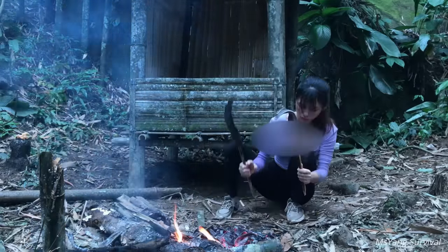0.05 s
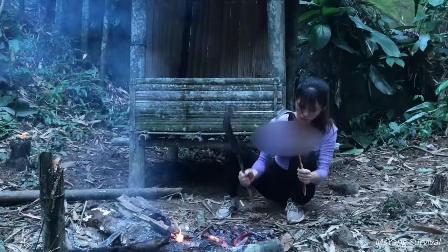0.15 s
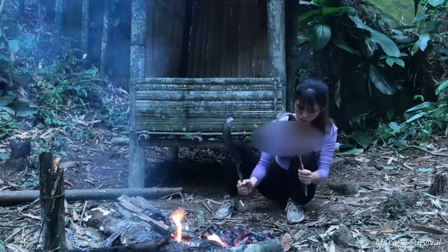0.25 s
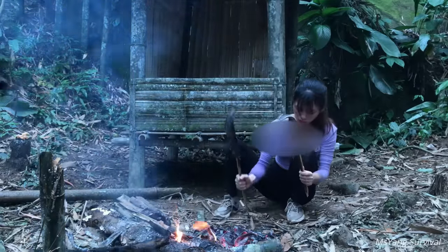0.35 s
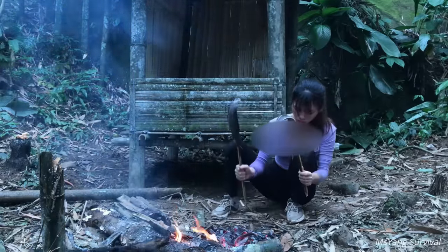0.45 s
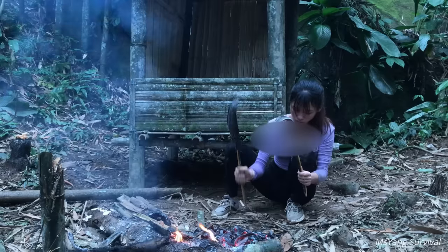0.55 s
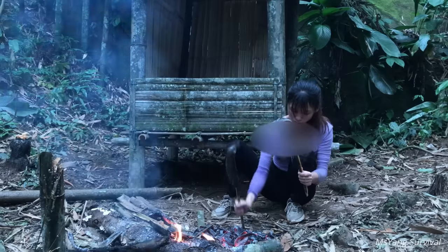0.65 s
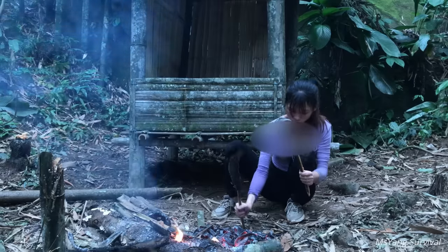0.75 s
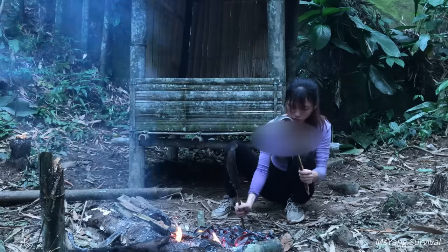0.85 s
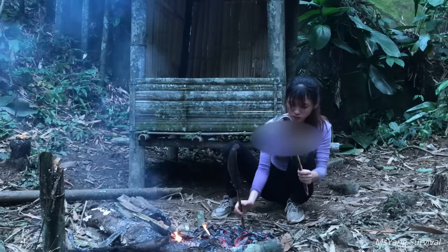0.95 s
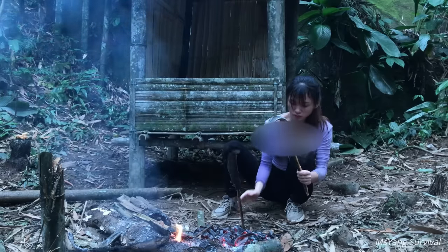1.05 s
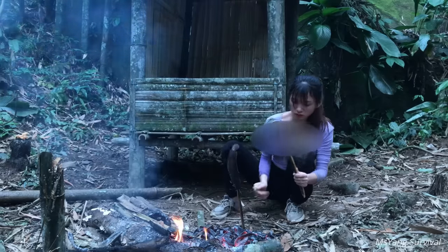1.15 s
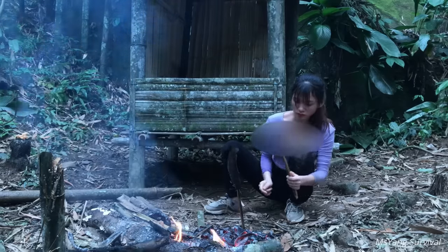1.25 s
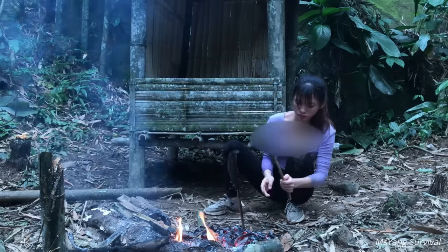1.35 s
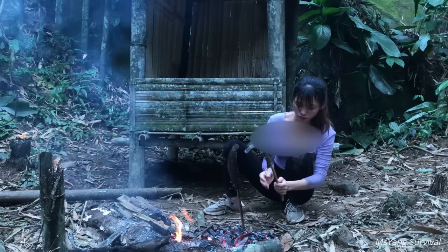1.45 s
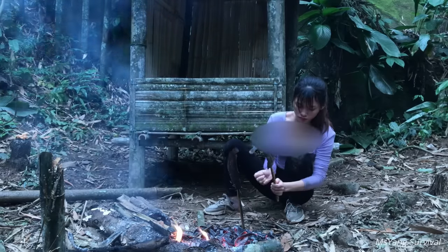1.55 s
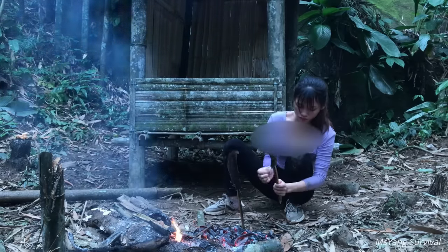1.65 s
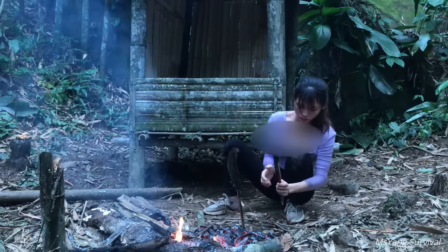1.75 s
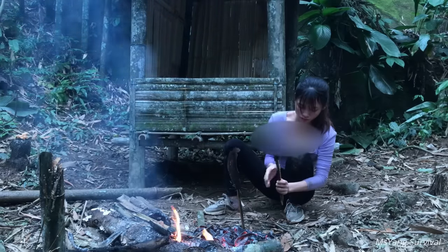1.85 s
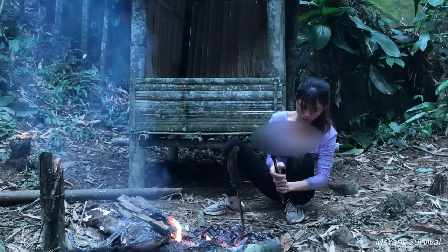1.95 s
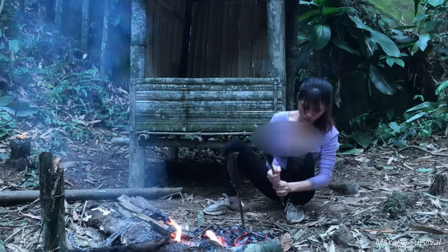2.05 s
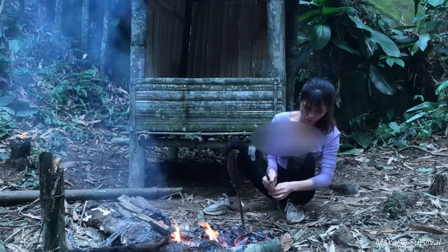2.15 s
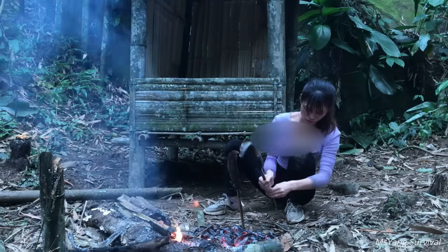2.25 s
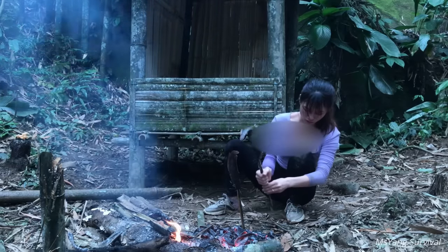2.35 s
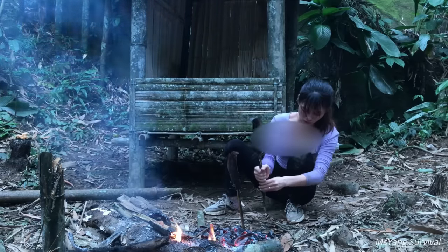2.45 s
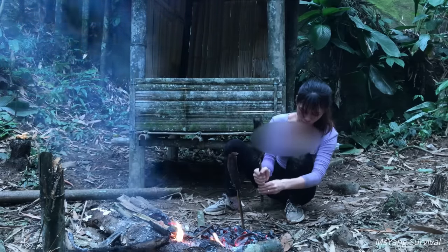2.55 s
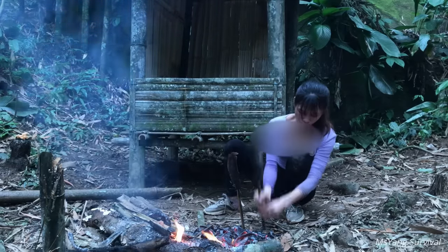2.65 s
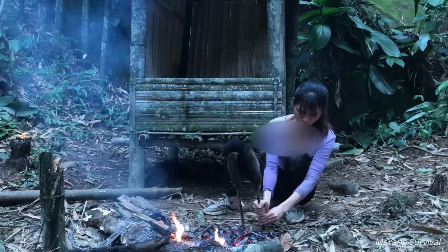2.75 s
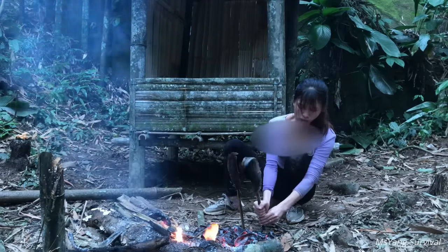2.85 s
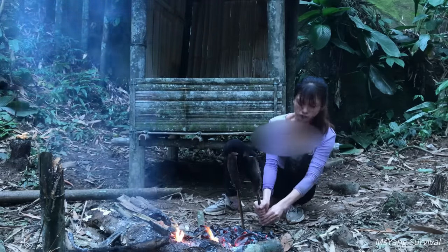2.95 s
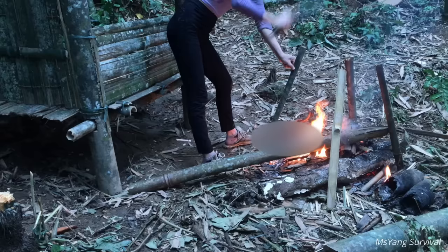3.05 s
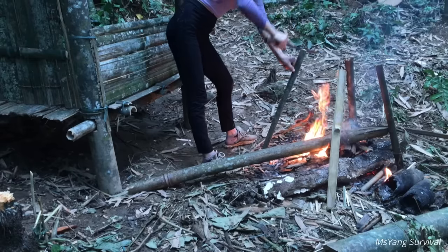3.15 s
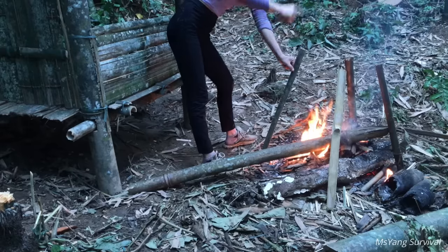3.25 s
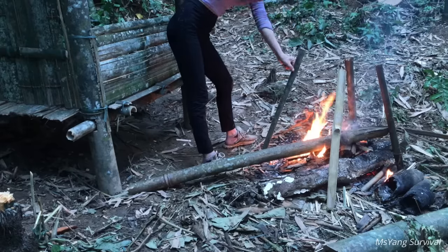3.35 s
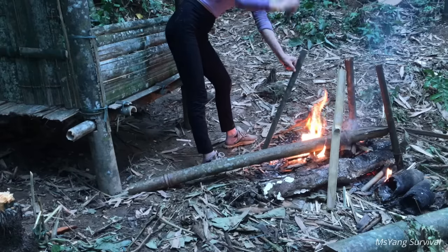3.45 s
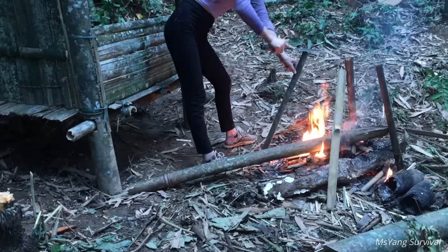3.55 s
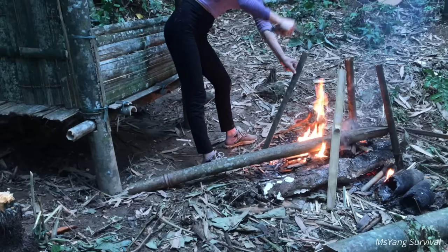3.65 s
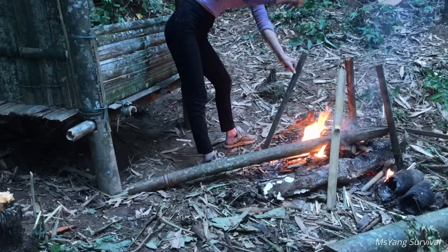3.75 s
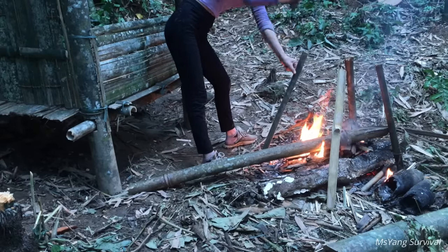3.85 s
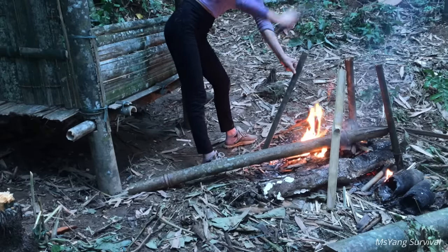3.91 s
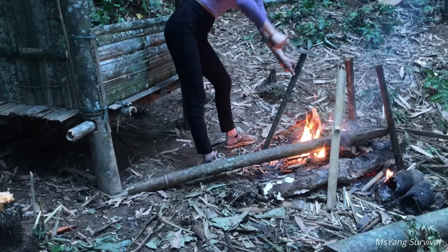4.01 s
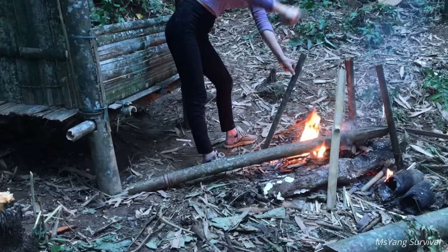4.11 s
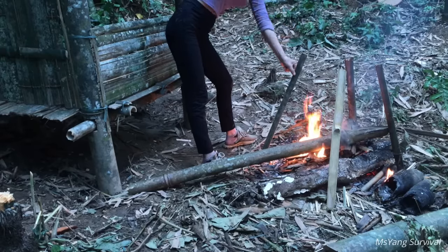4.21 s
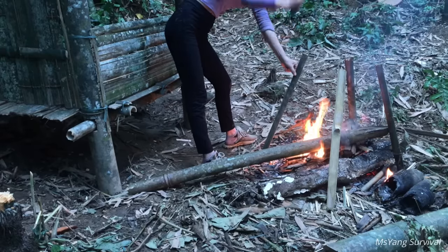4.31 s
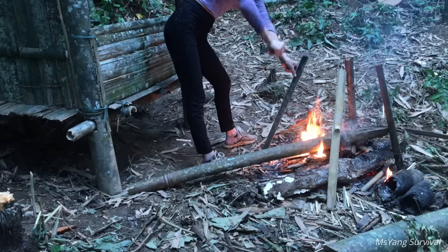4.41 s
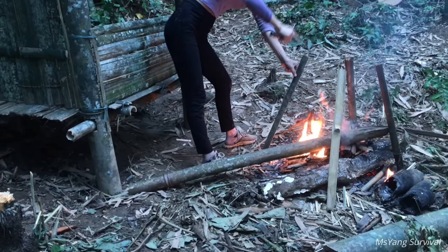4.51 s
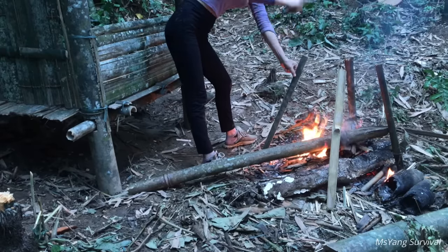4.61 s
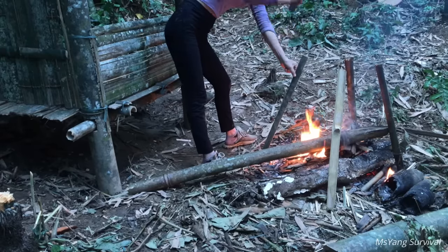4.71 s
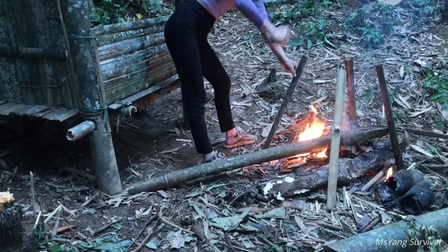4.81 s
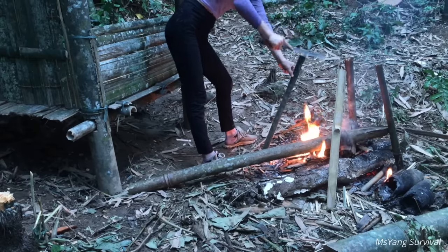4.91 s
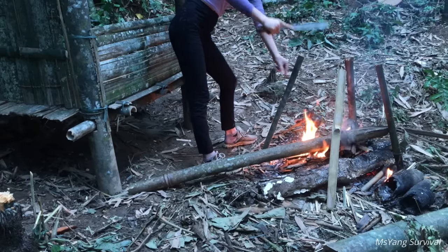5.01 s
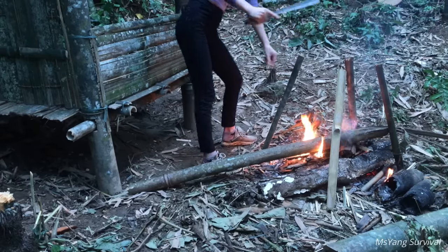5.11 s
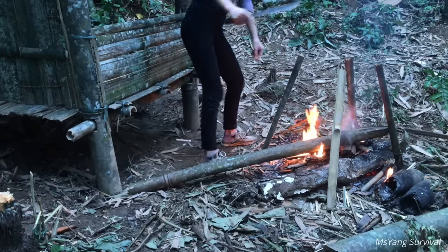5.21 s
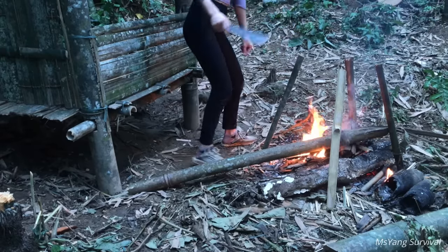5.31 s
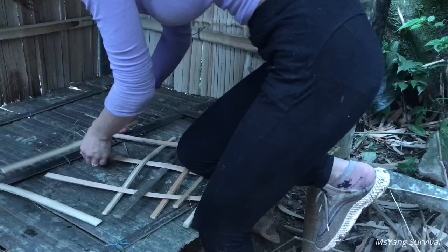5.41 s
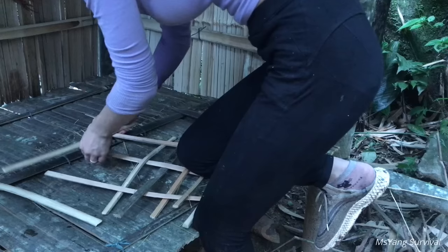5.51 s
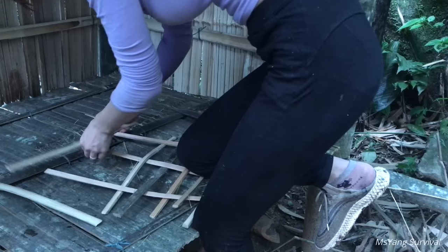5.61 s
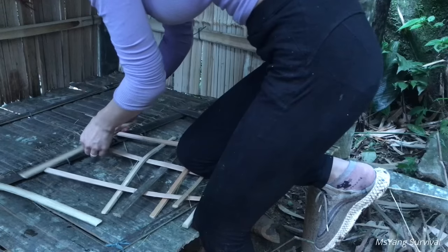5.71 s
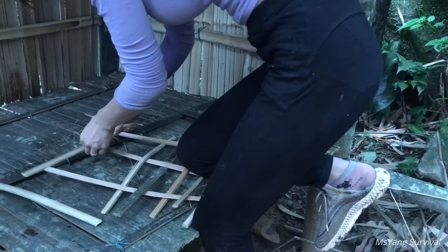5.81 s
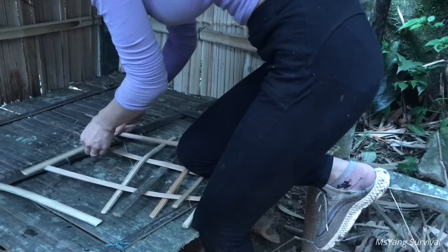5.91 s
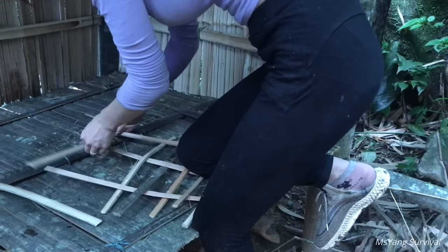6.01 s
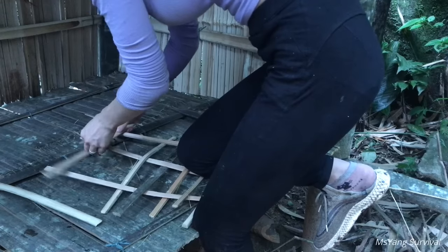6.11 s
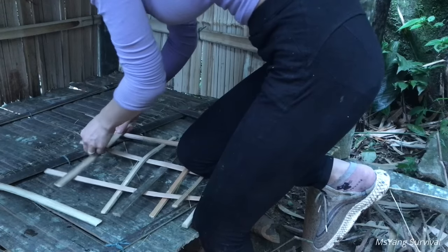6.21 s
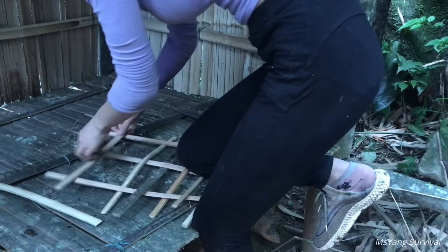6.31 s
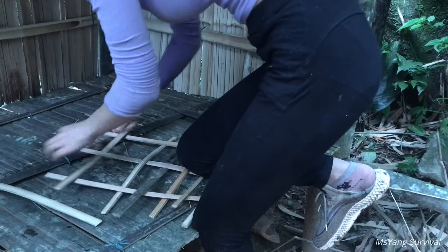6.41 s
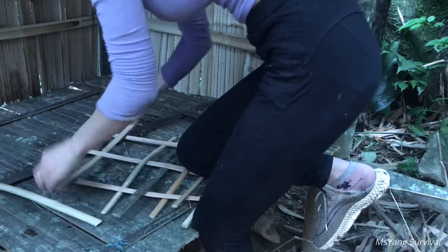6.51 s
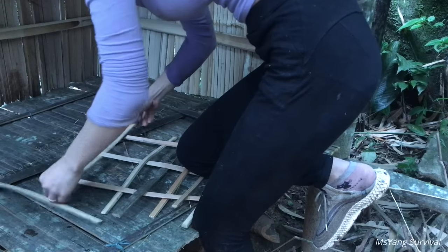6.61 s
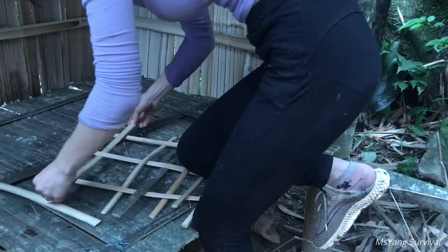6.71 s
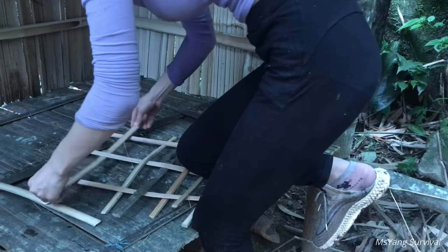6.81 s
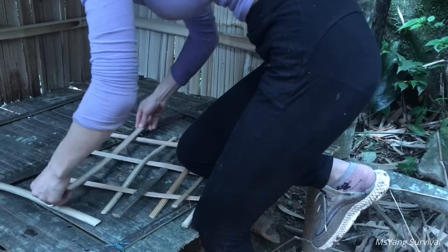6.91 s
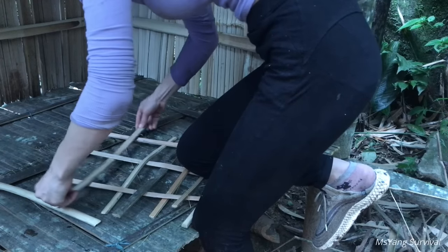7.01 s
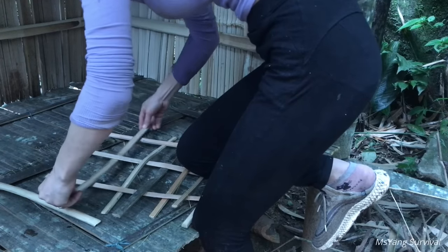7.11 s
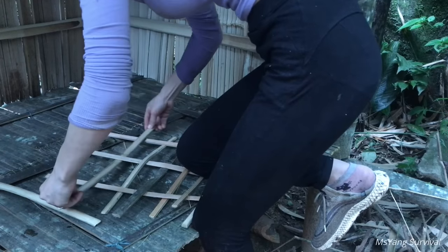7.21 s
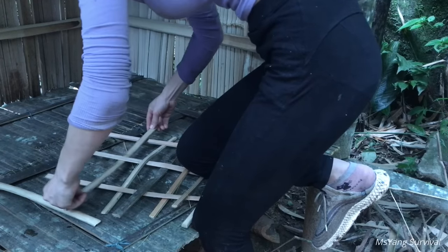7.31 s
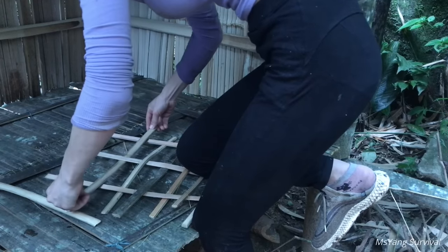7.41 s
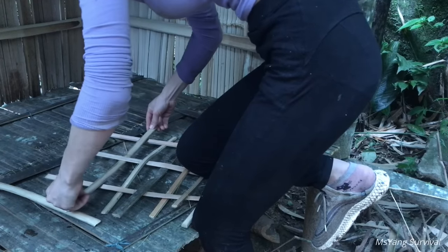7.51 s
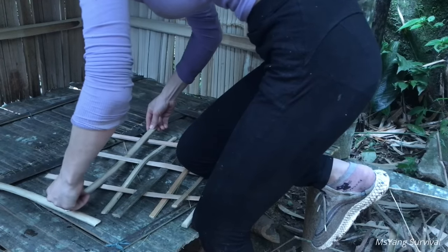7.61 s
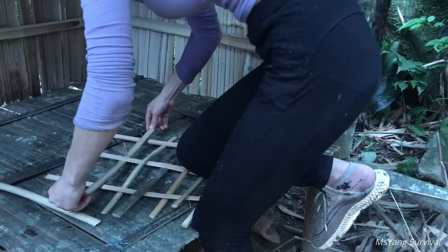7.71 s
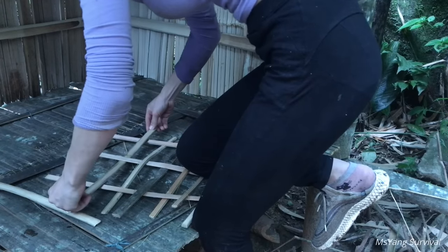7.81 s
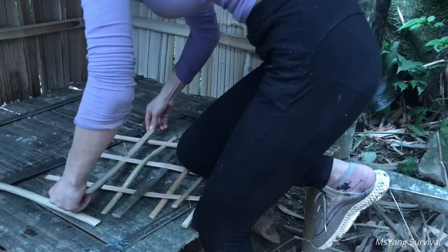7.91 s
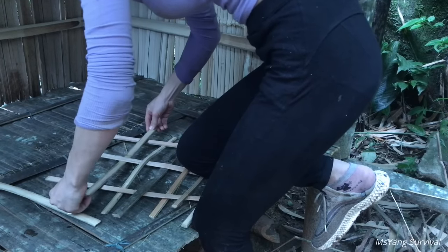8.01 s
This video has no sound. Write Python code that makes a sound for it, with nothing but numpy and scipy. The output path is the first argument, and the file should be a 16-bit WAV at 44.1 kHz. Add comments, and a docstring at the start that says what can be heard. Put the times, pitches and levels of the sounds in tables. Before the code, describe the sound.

A soft, steady forest hush runs throughout, dotted with tiny high ticks from a small campfire. In the first three seconds a heavy knife is handled quietly: a light click at about 0.7 seconds, a few soft bumps, and a small scrape near 2.7. From 3.1 to 4.9 seconds the knife drives a stake with five loud, evenly spaced blows, a little under half a second apart. Each is a sharp crack with a brief ring of wood and steel, a slight thump in the soil and a short echo from the trees; the later blows sound a little brighter. Two clearer fire ticks follow around 5.5 seconds. At 6.0 and 6.4 seconds bamboo slats clack lightly on a deck, with a hollow knock, and one slides faintly near 6.9. A soft bump and two more ticks come around 7.3, and the hush lasts until about 8 seconds.

```python
"""Beside a small campfire, which ticks over the hush of the forest throughout, a heavy knife is set into
the ground with light scrapes and bumps. From 3.1 s it drives a stake with five sharp blows. Each cracks,
rings in stake and blade, thumps the soil and scatters back from the trees; the stake sits ever firmer.
From 6 s bamboo slats are laid on a deck: they clack and knock, and one slides over the others."""
import sys
import numpy as np
from scipy import signal
from scipy.fft import rfft, irfft
from scipy.io import wavfile
from scipy.ndimage import uniform_filter1d

SR = 44100
rng = np.random.default_rng(int(sys.argv[2]) if len(sys.argv) > 2 else 0)


def generate_wav(signal):
    """Clip the signal to [-1, 1] and save it as 16-bit WAV at the path in sys.argv[1]."""
    frames = np.transpose(np.atleast_2d(signal))
    scaled = np.clip(frames, -1, 1) * 32767
    pcm = np.round(scaled).astype(np.int16)
    wavfile.write(sys.argv[1], SR, pcm)


N = 355394


def amp(db):
    """Decibels to gain."""
    return 10 ** (np.asarray(db) / 20)


def unit(x):
    """Scales to rms 1."""
    return x / np.sqrt(np.mean(x ** 2) + 1e-20)


def read(points, hz):
    """Reads a table on a log-frequency axis."""
    f, value = np.transpose(points)
    return np.interp(np.log(hz + 1), np.log(f + 1), value)


def add(mix, start_s, sound):
    """Mixes a sound in at start_s."""
    part = mix[round(start_s * SR):][:len(sound)]
    part += sound[:len(part)]


def bins(size):
    """FFT bin frequencies in Hz."""
    return np.fft.rfftfreq(size, 1 / SR)


def noise(colour_db, size):
    """Noise of rms 1, shaped bin by bin."""
    return unit(irfft(amp(colour_db) * np.exp(2j * np.pi * rng.random(len(colour_db))), size))


def decay(t, t60_s):
    """Exponential decay from t = 0, silent before."""
    return (t >= 0) * np.exp(-np.log(1000) * np.maximum(t, 0) / t60_s)


def octaves(hz):
    """Octaves above 4 kHz, held constant below 300 Hz."""
    return np.log2(np.maximum(hz, 300) / 4000)


# Knife blows. Each row: start in seconds, force in dB, second contact's delay in seconds and level in dB,
# hollow knock in Hz, its boost in dB, ringing pitch in Hz, its boost in dB.
BLOWS = [(3.1493, -1, 0.0045, -4, 1500, 4, 3510, 1.5), (3.5892, -2, 0.006, -2.5, 890, -0.5, 3300, .5),
         (4.0212, -1, .0035, -3, 1060, 8, 4860, 3), (4.4723, 1.2, .0055, -4.5, 1110, 6.5, 4040, 2.5),
         (4.8988, -1, 0.0044, -7, 980, 7.5, 3740, -2)]

def hammering(strike_db=-6, forest_db=-2.5, thump_db=-32):
    """The stake sits firmer after each blow: the next is brighter, carries farther, shakes more soil."""
    out = np.zeros(N)
    for firmness, (start_s, force_db, delay_s, second_db, *resonances) in enumerate(BLOWS):
        tilt_db_oct = -1 + 0.31 * firmness + 0.25 * force_db
        aim = [tilt_db_oct, *resonances]
        scatter_gain = amp(forest_db + 0.72 * firmness) * np.hypot(1, amp(second_db))
        add(out, start_s, amp(strike_db + force_db) * strike(delay_s, second_db, aim))
        add(out, start_s, scatter_gain * blow_scatter(aim))
        add(out, start_s, amp(thump_db + 0.37 * firmness) * soil_thump())
    return out


def emphasis_db(hz, tilt_db_oct, knock_hz, knock_db, ring_hz, ring_db):
    """The aim (point and angle of impact) decides which resonances are stirred most."""
    knock = knock_db * np.exp(-((hz - knock_hz) / 230) ** 2)
    ring = ring_db * np.exp(-((hz - ring_hz) / 300) ** 2)
    return tilt_db_oct * octaves(hz) + knock + ring


# Crack spectrum. Each row: frequency in Hz, relative level in dB.
CRACK_COLOUR = [(100, -47), (190, -26), (420, -20), (650, -19), (850, -13.5), (1150, -10), (1500, -9.5),
                (2000, -6), (2600, -6), (3600, -1), (4600, -1), (6700, -4), (7700, -6.5), (13500, -10),
                (16000, -19)]

def strike(delay_s, second_db, aim, crack_t60_s=0.04, ground_db=-18.5, modes_db=-21.5, rise_s=0.00029):
    """The blade lands twice; stake and blade ring, and the ground nearby scatters the crack."""
    t, hz = np.arange(16384) / SR, bins(16384)
    contacts = np.hypot(decay(t, crack_t60_s), amp(second_db) * decay(t - delay_s, crack_t60_s))
    envelope = np.hypot(contacts, amp(ground_db) * decay(t, t60_s=0.18))
    crack = noise(read(CRACK_COLOUR, hz) + emphasis_db(hz, *aim), len(t)) * envelope
    return (crack + amp(modes_db) * stake_and_blade(t, aim)) * (1 - np.exp(-t / rise_s))


# Modes; wood dies fast, steel sings on. Each row: frequency in Hz, base level in dB, base t60 in seconds.
STAKE_BLADE_MODES = [(890, -5.5, 0.066), (1201, -1.5, 0.09), (2130, -5, 0.15), (2520, 3, 0.081),
                     (3152, 5.5, 0.074), (3540, -7, 0.12), (3720, -16, 0.46), (3770, -1, 0.18),
                     (4304, -1.5, 0.11), (4420, -5, 0.2), (4720, -12.5, 0.39), (5000, -9, .14),
                     (5600, -25, 0.26), (5920, 0, 0.15), (6400, -6, 0.14), (6830, 4, .12),
                     (8300, -13, 0.24), (9300, -13, 0.33), (10900, -10, 0.3), (12100, -14, 0.37),
                     (13900, -17, .2)]

def stake_and_blade(t, aim, treble_gain=3.0, spread_db=2.0):
    """A brighter blow makes the top modes sing; those near its ringing pitch last longer."""
    tilt_db_oct, _, _, ring_hz, _ = aim
    out = np.zeros(len(t))
    for hz, db, t60_s in STAKE_BLADE_MODES:
        treble_db = treble_gain * tilt_db_oct * max(octaves(hz), 0)
        stirred_db = emphasis_db(hz, *aim) + treble_db + spread_db * rng.standard_normal()
        sustain = 1 + 0.41 * np.exp(-((hz - ring_hz) / 300) ** 2)
        tone = np.sin(2 * np.pi * (hz * t + rng.random()))
        out += amp(db + stirred_db) * decay(t, t60_s * sustain) * tone
    return out


# Soil modes. Each row: frequency in Hz, relative level in dB, time to crest in seconds.
SOIL_MODES = [(52, -34, .014), (81, -3.5, 0.018), (198, -8, 0.0076)]

def soil_thump(rumble_hz=80, rumble_db=-15, rumble_t60_s=0.28):
    """The soil takes the push: heavily damped modes swell and fade over a brief rumble."""
    t = np.arange(SR // 3) / SR
    push = sum(amp(db) * np.sin(2 * np.pi * hz * t) * (t / crest_s * np.exp(1 - t / crest_s)) ** 3
               for hz, db, crest_s in SOIL_MODES)
    detuning = (bins(2 * len(t)) - rumble_hz) / (rumble_hz / 2)
    rumble = noise(-20 * np.log10(1 + detuning ** 2), 2 * len(t))[:len(t)]
    return push + amp(rumble_db) * rumble * decay(t, rumble_t60_s)


def blow_scatter(aim):
    """The trees answer a unit-energy click with the colour of the blow."""
    hz = bins(512)
    click = np.fft.fftshift(irfft(amp(read(CRACK_COLOUR, hz) + emphasis_db(hz, *aim))))
    return forest(click / np.linalg.norm(click))


# Scatter spectrum. Each row: frequency in Hz, relative level in dB.
FOREST_COLOUR = [(200, 16), (600, 9), (1000, 2.5), (1700, -0.5), (4000, -2.5), (7000, -3), (10000, -4),
                 (15000, -4.5)]
# Scatter decay. Each row: frequency in Hz, t60 in seconds.
FOREST_T60 = [(300, 0.14), (1500, 0.29), (4000, 0.62), (8000, 0.66), (15000, 0.31)]

def forest(x, echo_s=0.212, echo_db=-17.0, echo_width_s=0.055, echo_cutoff_hz=7000, rise_s=0.0037):
    """Trunks and leaves scatter the sound; a farther slope gives a blurred echo."""
    hz, t, spectra = signal.stft(rng.standard_normal(SR), SR, nperseg=256)
    hz = hz[:, None]
    blur_s = np.where(t < echo_s, echo_width_s / 4, echo_width_s * 2)
    echo = amp(echo_db) * np.exp(-abs(t - echo_s) / blur_s) / (1 + (hz / echo_cutoff_hz) ** 2)
    envelope = np.hypot(decay(t, read(FOREST_T60, hz)), echo) * (1 - np.exp(-t / rise_s))
    tail = signal.istft(spectra * amp(read(FOREST_COLOUR, hz)) * envelope, SR, nperseg=256)[1]
    return signal.fftconvolve(x, tail / np.linalg.norm(tail))


# Knife and slat touches. Each row: start in seconds, level in dB, rise and t60 in seconds, tilt in dB per
# octave, resonance in Hz, its boost in dB, settling ring in Hz, its level against the touch in dB.
TOUCHES = [(0.027, -40.5, .002, .06, 0.5, 4000, 0, 6040, -7),
           (0.6605, -30.5, 0.00042, .045, -4, 3400, 13, 6400, -6.5),
           (2.68, -41.5, .0037, .13, -2, 3500, 9, 6400, -14),
           (6.021, -27, 0.0027, 0.031, -1.5, 8960, 13, 8850, -16),
           (6.3714, -22, 0.000087, 0.029, 1.5, 4200, 13, 5920, -10)]
# Knife, hands and knees on soil and deck; the higher bumps are hollow bamboo.
# Each row: start in seconds, level in dB, pitch in Hz.
BUMPS = [(.655, -49, 100), (1.135, -46, 263), (1.853, -44, 1080), (2.222, -44.5, 764), (6.416, -36.5, 987),
         (7.303, -42, 78)]

def handling(settle_delay_s=0.0046, forest_db=-20):
    """Knife and slats touch and settle among soft bumps and one slide; the trees answer faintly."""
    out = sliding_slat()
    for start_s, db, rise_s, t60_s, tilt_db_oct, peak_hz, peak_db, ring_hz, ring_db in TOUCHES:
        bending_mode = (0.47 * peak_hz, 0.39 * peak_db)
        touch = contact(rise_s, t60_s, tilt_db_oct, [(peak_hz, peak_db), bending_mode])
        settle = contact(rise_s=0.0012, t60_s=0.084, tilt_db_oct=1, resonances=[(ring_hz, 21.5)])
        add(out, start_s, amp(db) * touch)
        add(out, start_s + settle_delay_s, amp(db + ring_db) * settle)
    for start_s, db, hz in BUMPS:
        add(out, start_s, amp(db) * bump(hz))
    return out + amp(forest_db) * forest(out)[:N]


def bump(hz, length_at_1khz_s=0.015):
    """A soft knock: one pitch swells and fades, shorter when higher."""
    length_s = length_at_1khz_s * (hz / 1000) ** -0.45
    t = np.arange(0, length_s, 1 / SR)
    return np.sin(2 * np.pi * hz * t) * np.sin(np.pi * t / length_s) ** 2


# Contact and friction spectrum. Each row: frequency in Hz, relative level in dB.
CONTACT_COLOUR = [(200, -32), (800, -16), (2200, -5), (5500, -6.5), (9000, -6), (16000, -12.5)]

def contact(rise_s, t60_s, tilt_db_oct, resonances, width_hz=170):
    """A short scrape or clack, coloured by resonances given as (Hz, dB)."""
    t, hz = np.arange(8192) / SR, bins(8192)
    peaks_db = sum(db / (1 + ((hz - peak_hz) / width_hz) ** 2) for peak_hz, db in resonances)
    colour_db = read(CONTACT_COLOUR, hz) + tilt_db_oct * octaves(hz) + peaks_db
    return noise(colour_db, len(t)) * decay(t, t60_s) * (1 - np.exp(-t / rise_s))


def sliding_slat(fastest_at_s=6.88, level_db=-51, rise_s=0.13, fall_s=0.065):
    """Friction hiss follows the speed of the slat."""
    t = np.arange(N) / SR - fastest_at_s
    speed = np.exp(-(t / np.where(t < 0, rise_s, fall_s)) ** 2)
    return amp(level_db) * speed * noise(read(CONTACT_COLOUR, bins(N)), N)


# Clear fire ticks. Each row: start in seconds, level in dB, spectral peak in Hz.
FIRE_TICKS = [(.325, -48, 13000), (5.349, -43, 11100), (5.609, -38, 6500), (7.292, -44, 8000),
              (7.358, -40, 8400)]

def fire(tiny_per_s=9, tiny_db=-54, t60_s=0.014, peak_db=14, width_hz=1100):
    """Pockets of sap burst: a few clear ticks and many tiny ones."""
    out, t, hz = np.zeros(N), np.arange(2048) / SR, bins(2048)
    draws = rng.random((int(tiny_per_s * N / SR), 3))
    tiny_ticks = [(when * N / SR, tiny_db + 3 * min(-np.log(size), 3), 4000 + 10000 * pitch)
                  for when, size, pitch in draws]
    for start_s, db, peak_hz in list(FIRE_TICKS) + tiny_ticks:
        colour_db = peak_db / (1 + ((hz - peak_hz) / width_hz) ** 2)
        add(out, start_s, amp(db) * noise(colour_db, len(t)) * decay(t, t60_s))
    return out


# Air spectra at hut, stake and deck. Each row: frequency in Hz, relative level in dB.
HUT_AIR = [(15, -58), (25, -39), (49, -7.5), (256, -2.5), (405, -9), (560, -6.5), (641, -7.5), (734, -6.5),
           (1230, -6.5), (1790, -8.5), (2000, -8.5), (3340, -9.5), (10700, -18.5), (14800, -21),
           (16000, -17)]
STAKE_AIR = [(15, -40), (25, -9.5), (97, -0.5), (170, -6.5), (416, -11), (476, -12), (624, -8),
             (754, -14.5), (818, -6), (1290, -6), (1840, -10), (2690, -9), (16000, -21)]
DECK_AIR = [(15, -45), (25, -23), (74, 0.5), (114, -6), (293, -5.5), (451, -12), (624, -7), (863, -9.5),
            (962, -5), (1480, -9), (1650, -11), (3920, -14), (10400, -23.5), (14800, -26), (16000, -25)]

def forest_air(levels_db=(-48.5, -49.5, -48), changes_s=(3.1, 5.42), flutter_db=0.5):
    """The hush of the forest in three shades, each taking over abruptly from the last; its level flutters
    slightly."""
    out = np.zeros(N)
    spot = np.searchsorted(changes_s, np.arange(N) / SR)
    for k, colour in enumerate([HUT_AIR, STAKE_AIR, DECK_AIR]):
        crossfade = np.sqrt(abs(uniform_filter1d(1. * (spot == k), size=800)))
        out += crossfade * amp(levels_db[k]) * noise(read(colour, bins(N)), N)
    flutter = unit(uniform_filter1d(rng.standard_normal(N), size=4000))
    return out * amp(flutter_db * flutter)


def scene():
    """All sources, in mono."""
    return (hammering() + handling() + fire() + forest_air())[None]


# Microphone dips. Each row: centre in Hz, width in Hz, gain in dB.
MIC_DIPS = [(4920, 330, -2), (7780, 280, -4), (10390, 440, -4)]

def record(dry, ceiling=0.9, cutoff_hz=15950):
    """Microphone colour, soft overload on the blows, then a low-pass."""
    hz = bins(N)
    dips_db = sum(db * np.exp(-((hz - centre_hz) / width_hz) ** 2) for centre_hz, width_hz, db in MIC_DIPS)
    coloured = irfft(rfft(dry) * amp(dips_db), N)
    rounded = coloured / (1 + (coloured / ceiling) ** 4) ** 0.25
    lowpass = signal.firwin(401, cutoff_hz, window=("kaiser", 9), fs=SR)
    return signal.oaconvolve(rounded, lowpass[None], "same")


dry = scene()
out = record(dry)
generate_wav(out)
```